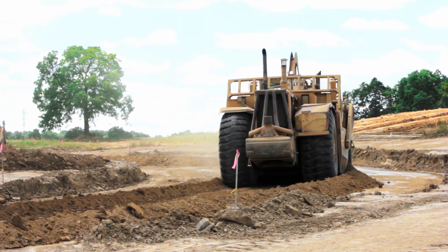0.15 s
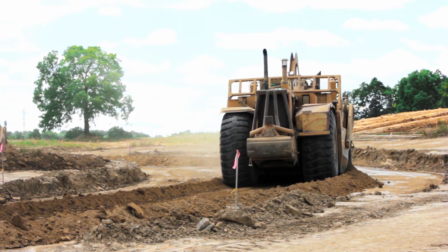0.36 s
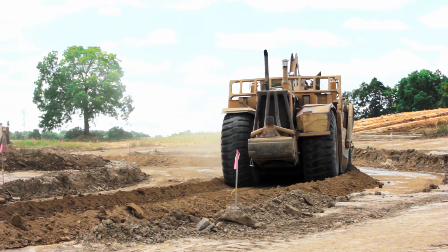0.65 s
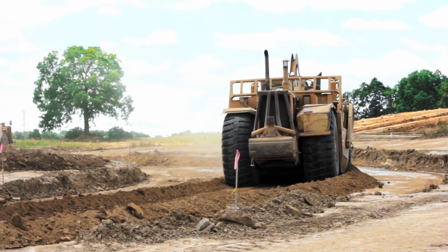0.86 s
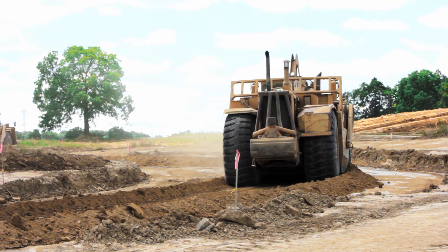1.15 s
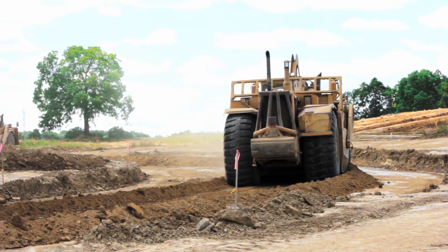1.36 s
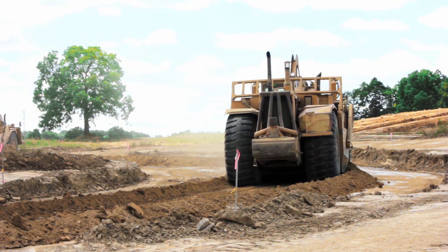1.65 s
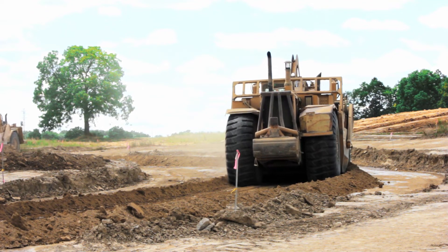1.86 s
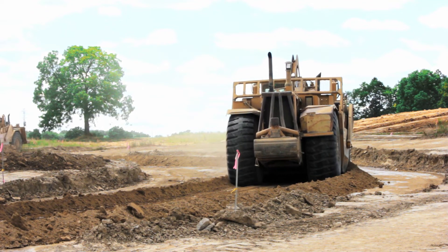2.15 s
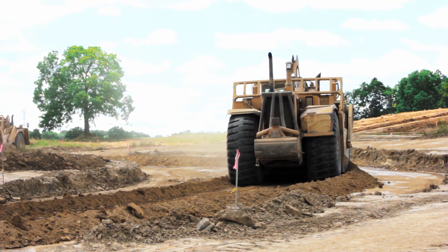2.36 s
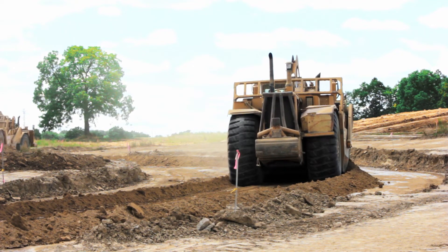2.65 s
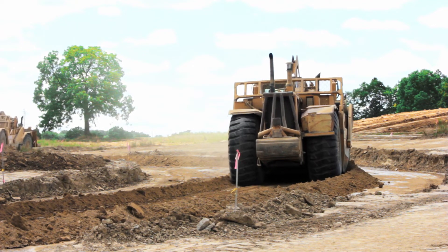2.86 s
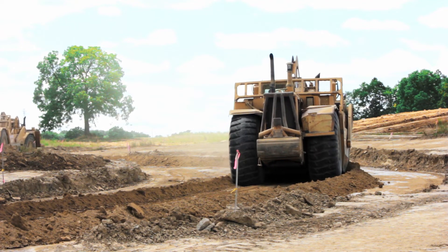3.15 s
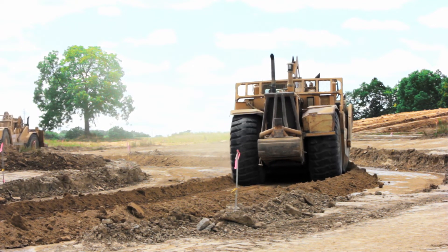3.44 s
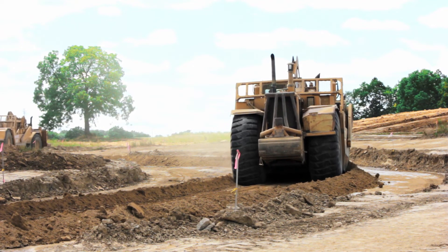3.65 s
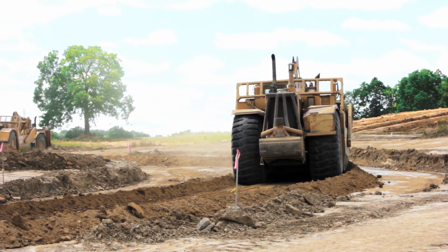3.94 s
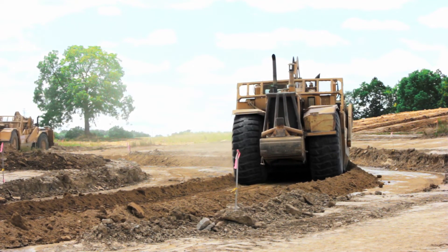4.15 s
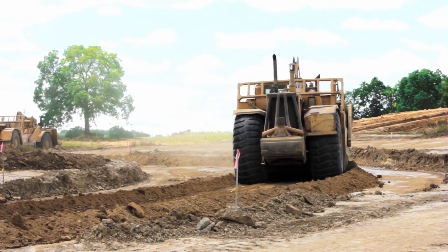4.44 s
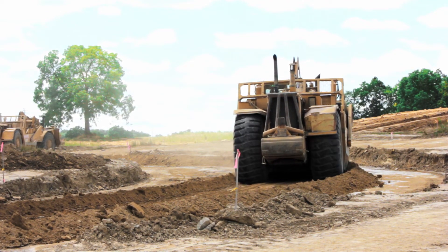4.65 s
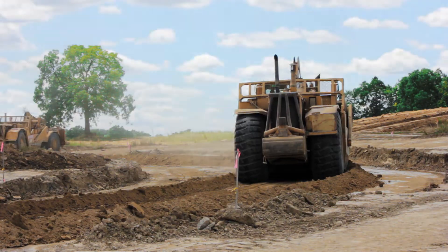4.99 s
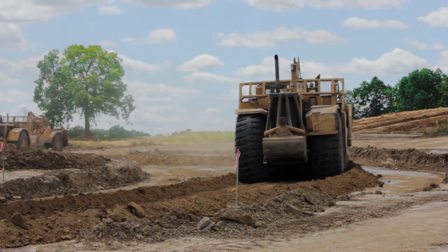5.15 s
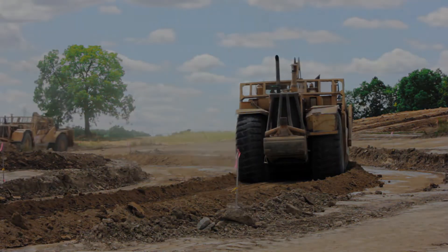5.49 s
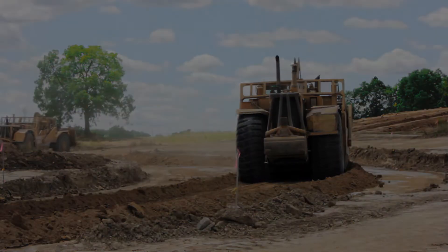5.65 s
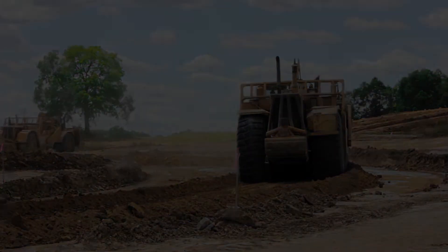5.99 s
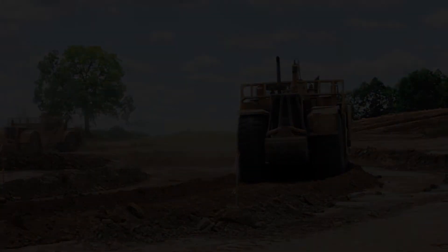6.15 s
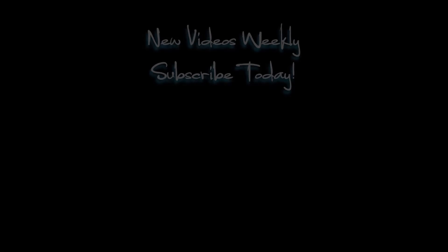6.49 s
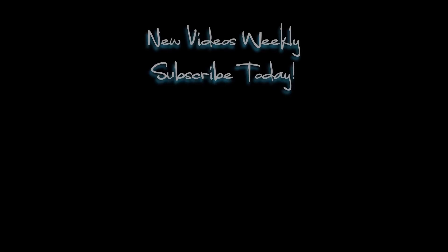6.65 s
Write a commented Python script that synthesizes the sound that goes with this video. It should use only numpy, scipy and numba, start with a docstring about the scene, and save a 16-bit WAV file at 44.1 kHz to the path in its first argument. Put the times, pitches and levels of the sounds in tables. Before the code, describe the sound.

Outdoors on open ground, a large earthmoving machine crawls closer with its diesel at nearly constant speed. A low exhaust drone, dense mechanical clatter and breathy hiss run together over soft tyre rumble, with a second engine faintly behind. A slightly harder pull swells the tone early on, then everything fades evenly to silence. The microphone stands in front at a moderate distance.

```python
"""Open ground: a big earthmoving scraper crawls closer over soft dirt, its diesel at a nearly steady speed.
Exhaust tones tied to the crank drone and bark twice a cycle; chopped noise makes the clatter of the block.
Noise through moving resonances is rushing air that puffs with the crank and swells in surges.
Wavering tones make a second diesel further off, a gliding tone is the drive hum, and low noise is
the tyres on soil. The whole scene fades out."""
import sys
import numpy as np
from scipy import signal
from scipy.fft import rfft, irfft, next_fast_len
from scipy.io import wavfile
from scipy.ndimage import uniform_filter1d, map_coordinates
from numba import njit

SR = 44100
rng = np.random.default_rng(int(sys.argv[2]) if len(sys.argv) > 2 else 0)


def wav_record(signal):
    """Record a signal, one row per channel, as 16-bit PCM in the file named by sys.argv[1]."""
    frames = np.transpose(np.atleast_2d(signal))
    bounded = np.clip(frames, -1, 1)
    # unit amplitude maps onto the largest positive 16-bit level
    quanta = np.round(bounded * 32767).astype(np.int16)
    wavfile.write(sys.argv[1], SR, quanta)


N = 300843
TIME = np.arange(N) / SR  # seconds
# A "cycle" below is one engine cycle: two turns of the crank.
SURGE_RISE_S, SURGE_FALL_S = 0.033, 0.041


def undb(db):
    """Turn decibels into a gain."""
    return 10 ** (np.asarray(db) / 20)


def unit(x):
    """Scale a signal to an rms of 1."""
    return x / np.sqrt(np.mean(x ** 2))


def curve(table, axis=1):
    """Join one column of a table by straight lines in time."""
    rows = np.array(table)
    return np.interp(TIME, rows[:, 0], rows[:, axis])


def colour(x, spectrum):
    """Filter white noise of rms 1 to a spectrum of (frequency [Hz], level [dB per Hz]) points."""
    hz, db = np.transpose(spectrum)
    size = next_fast_len(N)
    bin_hz = np.fft.rfftfreq(size, 1 / SR)
    gain = undb(np.interp(np.log(bin_hz + 1), np.log(hz), db))
    return irfft(rfft(x, size) * gain, size)[:N] * np.sqrt(SR / 2)


def walk(rate):
    """Wander slowly with rms 1: random levels, about `rate` per second, smoothed into ramps."""
    hold = int(SR / rate)
    steps = np.repeat(rng.standard_normal(N // hold + 1), hold)
    return unit(uniform_filter1d(steps, hold)[:N])


@njit
def resonance(x, hz, width):
    """Let noise ring around a moving centre, using a state-variable band-pass filter."""
    y, band, low = np.empty(len(x)), 0., 0.
    for i in range(len(x)):
        g, k = np.tan(np.pi * hz[i] / SR), width / hz[i]
        v = (band + g * (x[i] - low)) / (1 + g * (g + k))
        band = 2 * v - band
        low = low + 2 * g * v
        y[i] = k * v
    return y


def span(start, end, rise, fall):
    """Rise from 0 to 1, hold and fall; half way up at start and half way down at end."""
    return np.clip(np.minimum((TIME - start) / rise, (end - TIME) / fall) + .5, 0, 1)


def throb(cycle, depth, order):
    """Make a gain that swings `order` times in each engine cycle."""
    return 1 + depth * np.cos(2 * np.pi * order * cycle)


def accents(cycle, table):
    """Lift the level, in dB around a mean of 0, at crank angles that repeat every cycle."""
    lift_db = 0
    for place, width, db in table:
        distance = (cycle - place + .5) % 1 - .5
        lift_db = lift_db + db * np.exp(-(distance / width) ** 2)
    return lift_db - lift_db.mean()


def locked(cycle, count):
    """Repeat one random pattern of `count` points on every engine cycle, at rms 1."""
    pattern = rng.standard_normal(count)
    place = cycle % 1 * count
    return unit(map_coordinates(pattern - pattern.mean(), [place], order=3, mode="grid-wrap"))


def crank():
    """Count engine cycles from the crank speed; one cycle takes two turns."""
    # Crank speed: (time [s], speed [turns per minute])
    speed = [(0, 2019.1), (1, 2018.3), (2, 2021.2), (2.8, 2023.2), (3.6, 2020.8), (4.6, 2017.4),
             (5.1, 2018.7), (5.9, 2017.0)]
    return np.cumsum(curve(speed)) / 120 / SR - .23


def hard_pull():
    """Tell how hard the machine is digging in, 0-1, during its one hard pull."""
    start_s, end_s, ramp_s = 1.73, 3.0, 0.17
    return span(start_s, end_s, ramp_s, ramp_s)


def exhaust(cycle, flutter=.055, waver_db=.4):
    """Add tones locked to the crank, lined up at the barks of each cycle and an echo of the main one."""
    # Exhaust tones before swell and overall level: (waves per cycle, level [dB rms])
    tones = [(4, -47.5), (6, -31.0), (9, -48.5), (10, -46.0), (12, -22.0), (13, -41.0), (14, -36.0),
             (15, -42.5), (16, -40.0), (17, -41.0), (18, -41.5), (19, -40.0), (20, -42.0), (22, -46.5),
             (23, -43.5), (24, -41.0), (25, -43.0), (26, -41.0), (27, -41.5), (28, -48.0), (29, -40.0),
             (30, -40.0), (31, -47.0), (32, -40.0), (33, -37.3), (35, -38.5), (36, -46.5), (38, -49.0),
             (47, -45.0), (48, -45.5), (49, -46.5), (51, -48.0), (54, -44.5), (57, -47.0)]
    # Exhaust barks and the pipe echo after the main one: (place in the cycle [0-1], relative strength)
    bark_places = [(.001, 1), (.032, .5), (.376, .62), (.402, .42), (.49, .55)]
    # Swell and sag of the firing note: (time [s], level [dB])
    drone_swell = [(0, -.8), (.55, -.4), (.68, -1.8), (1, -.2), (1.17, -2.8), (1.35, -.3), (1.6, -1.2),
                   (1.8, 1.3), (2, 2.3), (2.17, -.5), (2.5, 1.3), (2.63, -.5), (2.75, 2.7), (2.86, -2.6),
                   (2.96, 1.5), (3.45, -.5), (3.65, .5), (4.15, -.5), (4.35, 1.2), (4.95, -1.2), (5.2, -.3),
                   (5.62, -.8), (5.8, -3.3), (6, -.3)]
    cylinders = 12  # also the order of the firing note
    pull_db, pull_octaves = 1.5, .6
    bright_order, bright_octaves, bright_db_per_s = 34, .2, .55
    out, shared_flutter = 0, walk(34)
    for order, db in tones:
        barks = sum(size * np.exp(-2j * np.pi * order * place) for place, size in bark_places)
        # each bark is a dip and then a spike, its treble smeared by the pipe
        smear = (.1 + .3 * (order / 36) ** 4) * rng.standard_normal()
        lead = np.angle(barks) - 1.1 + smear
        # uneven burning and moving air shake the high tones most
        height = order / 20
        shake = (1 + flutter * np.sqrt(height) * shared_flutter) * undb(waver_db * height * walk(5))
        if order == cylinders:
            # the firing note heaves and trembles
            swell_db = curve(drone_swell) + .4 * walk(25)
        else:
            # pulling hard swells the tones around the firing note
            nearness = np.exp(-(np.log2(order / cylinders) / pull_octaves) ** 2)
            swell_db = pull_db * nearness * hard_pull()
        # some upper tones come forward as the machine nears
        brightness = np.exp(-(np.log2(order / bright_order) / bright_octaves) ** 2)
        swell_db = swell_db + bright_db_per_s * (TIME - TIME.mean()) * brightness
        tone = np.cos(2 * np.pi * order * cycle + lead)
        out = out + np.sqrt(2) * undb(db + swell_db) * shake * tone
    # the exhaust as a whole sinks slowly and wavers in the moving air
    return out * undb(.56 - .18 * TIME + .04 * walk(7))


def clatter(cycle, firing_depth=0.069, fan_depth=0.025, stumble_db=.5, bounce_share=0.11, bounce_drift=0.099):
    """Rattle injectors and valves at set crank angles; firings and fan chop it, the ground mirrors it."""
    # The loudest knocks of the block: (place in the cycle [0-1], width [cycles], lift [dB])
    knock_places = [(.02, .05, 1.1), (.178, .013, 2.6), (.225, .02, 1.2), (.44, .04, 1), (.6, .018, 1.3),
                    (.76, .012, 1.3), (.885, .035, 1.6)]
    # Combustion knock and gear clatter, before load: (frequency [Hz], level [dB per Hz])
    rattle_spectrum = [(150, -94), (345, -59), (400, -58), (465, -59), (585, -55), (665, -59.5), (800, -57),
                       (880, -57), (1030, -56.5), (1550, -61), (1900, -61), (2400, -61.5), (3100, -63.5),
                       (4000, -66), (5500, -73), (7200, -77.5), (10500, -93.5), (15000, -106)]
    # Clatter that is alike on every cycle, before load: (frequency [Hz], level [dB per Hz])
    tapping_spectrum = [(200, -100), (450, -72), (650, -72), (1000, -66), (1400, -71), (2000, -70),
                        (3500, -79.5), (8000, -110)]
    # Engine load, used for its ups and downs around the mean: (time [s], level [dB])
    load = [(0.2, -25), (0.8, -26), (1.3, -25), (2.8, -25.5), (3.4, -26.5), (6, -27.5)]
    ground_lag_s = 0.00061
    knocks = undb(accents(cycle, knock_places) + stumble_db * walk(45))
    gate = unit(knocks * throb(cycle, firing_depth, order=6) * throb(cycle, fan_depth, order=14))
    rattle = colour(gate * rng.standard_normal(N), rattle_spectrum)
    tapping = colour(gate * locked(cycle, count=int(N / cycle[-1])), tapping_spectrum)
    load_db = curve(load)
    direct = (rattle + tapping) * undb(load_db - load_db.mean())
    # moving air shifts the lag of the bounce, so the colour drifts
    lag_s = ground_lag_s * (1 + bounce_drift * walk(3))
    bounce = np.interp(TIME - lag_s, TIME, direct)
    return direct + bounce_share * bounce


def gear_whine(cycle, db=-45, waver_db=3, order=110):
    """Sing one thin, wavering tone from the timing gears, locked to the crank."""
    level = np.sqrt(2) * undb(db + waver_db * walk(9))
    return level * np.sin(2 * np.pi * order * cycle + 1.3 * walk(15))


def surges(axis):
    """Lift the level, in dB, in short surges of air: axis 0 for the hiss, 1 for the sizzle."""
    # Surges of rushing air: (start [s], length [s], hiss lift [dB], sizzle lift [dB]);
    # each lift is scaled later by the share that its sound takes
    surge_list = [(.06, .09, 1, 3), (.36, .15, 4.2, 5.5), (.53, .17, 2, 2.4), (.88, .14, 2.6, 1.4),
                  (1.25, .09, 4.6, 4), (1.46, .06, 1.2, 2.5), (2.47, .33, 3, 4), (4.16, .35, 6, 5),
                  (4.52, .08, 2.5, 1), (4.64, .12, 4.8, 4.4), (4.9, .105, 5.6, 4), (5.19, .08, .8, 3),
                  (5.42, .08, .8, 4.5), (5.61, .08, 1, 4.5)]
    lift_db = 0
    for start, length, *db in surge_list:
        lift_db = lift_db + db[axis] * span(start, start + length, SURGE_RISE_S, SURGE_FALL_S)
    return lift_db


def sizzle(cycle, nearing_db_per_s=0.2, surge_share=1.1):
    """Shape the faint top of the hiss: it flares with surges and spits unevenly at one crank angle."""
    # Faint top of the hiss, before its rises and flares: (frequency [Hz], level [dB per Hz])
    top_spectrum = [(5000, -101), (9500, -86.5), (10600, -96), (11400, -93.5), (13500, -100), (14500, -98),
                    (15500, -102)]
    spit_place, spit_width = .385, .035  # in cycles
    spit_force_db = 2 + 1.8 * walk(17)
    spit_db = accents(cycle, [(spit_place, spit_width, 1)]) * spit_force_db
    flicker_db = .8 * walk(45)
    db = nearing_db_per_s * TIME + surge_share * surges(axis=1) + spit_db + flicker_db
    return colour(rng.standard_normal(N), top_spectrum) * undb(db)


def air(cycle, firing_depth=.09, band_waver_db=.8):
    """Puff hiss at set crank angles; its resonances shift and trade strength as the machine nears."""
    # Puffs of hiss, before scatter and share: (place in the cycle [0-1], width [cycles], lift [dB])
    puff_places = [(.02, .05, 1.1), (.19, .025, 1.4), (.4, .045, 3.6), (.57, .075, 3), (.73, .015, 1.4),
                   (.885, .03, 2.8)]
    # Flow of rushing air, used relative to the mean level: (time [s], level [dB])
    flow = [(0, -36.5), (1.75, -38.5), (1.92, -35), (2.4, -36.5), (3.1, -37.5), (3.45, -42), (4.1, -42.5),
            (4.8, -44), (6, -39)]
    # Resonances: (early centre [Hz], late centre [Hz], width of each of two filter passes [Hz],
    # early, middle and late level over the mean level [dB], share of flow and surge [dB per dB])
    bands = [(2950, 3150, 750, -3, -1.8, -1.2, .3), (4620, 5030, 1050, 1, 1.2, 3, .6),
             (5760, 5500, 500, -5, -14, -5.5, .8), (6370, 6560, 800, -3.8, -3.8, -3, 1.1),
             (7820, 7650, 1300, -9, -7, .2, 1.3), (8190, 8600, 1100, -2.7, -3.8, -3.6, 1.05)]
    mean_db = -34
    # the lower resonances puff deepest, and ring louder for a moment
    low_puff_share, low_puff_below_hz = 1.5, 7000
    ring_start_s, ring_end_s, ring_db, ring_below_hz = 1.22, 1.68, 3, 5000
    ring = ring_db * span(ring_start_s, ring_end_s, SURGE_RISE_S, SURGE_FALL_S)
    # puffs differ in force from cycle to cycle
    puff_db = accents(cycle, puff_places) * (1 + .25 * walk(34))
    late = curve([(1.2, 0), (3.2, .5), (4.3, 1)])  # 0 early, 1 late
    stage = curve([(1.5, 0), (2.1, 1), (3.3, 1), (4.3, 2)])  # 0 early, 1 middle, 2 late
    # turbulence makes the flow flicker
    surge_db = curve(flow) + surges(axis=0) - mean_db + .8 * walk(40)
    out = sizzle(cycle) * unit(undb(puff_db))
    for early_hz, late_hz, width, *stage_db, share in bands:
        hz = (early_hz + (late_hz - early_hz) * late) * (1 + .014 * walk(10))
        db = np.interp(stage, np.arange(3), stage_db) + band_waver_db * walk(18)
        if early_hz < ring_below_hz:
            db = db + ring
        puff_share = low_puff_share if early_hz < low_puff_below_hz else 1
        puffs = undb(puff_db * puff_share)
        once = resonance(rng.standard_normal(N), hz, 1. * width)
        band = resonance(once, hz, 1. * width)
        out = out + unit(band * puffs) * undb(mean_db + db + share * surge_db)
    return out * throb(cycle, firing_depth, order=6)


def far_diesel():
    """Rumble low engine tones that grow as a second machine nears, and waver on their way over the ground."""
    # Tones before the slow growth: (frequency [Hz], width of the pitch waver [Hz], level [dB rms])
    far_tones = [(62.2, 5, -49.5), (112.3, 6, -40.5), (122.8, 5.5, -43), (146.5, 4, -38),
                 (170.2, 5.3, -38.5), (185.8, 10, -45), (207, 12, -43)]
    nearing_db_per_s = 0.6
    out = 0
    for hz, width, db in far_tones:
        phase = np.cumsum(hz + width / 2 * walk(12)) / SR + rng.random()
        tone = undb(2.2 * walk(7.8)) * np.sin(2 * np.pi * phase)
        out = out + undb(db) * unit(tone)
    return out * undb(nearing_db_per_s * (TIME - TIME.mean()))


def drive_hum(lift_db=.8):
    """Glide a single tone that sags and recovers with the drive, and nearly dies in the hard pull."""
    # The hum, before its lift and waver: (time [s], pitch [Hz], level [dB rms])
    glide = [(.15, 297, -31.5), (.35, 286, -34), (.6, 294, -31), (.75, 289, -33), (.92, 277, -29),
             (1.18, 275, -31), (1.32, 257, -33.5), (1.65, 252, -34), (1.8, 248, -43), (2.85, 246, -44),
             (3.1, 253, -35.5), (3.5, 268, -33), (3.95, 275, -32), (4.08, 270, -37), (4.35, 267, -35),
             (4.75, 255, -32), (5.05, 251, -32), (5.28, 256, -30), (5.42, 262, -36), (5.85, 281, -31.5),
             (6.15, 294, -34)]
    phase = np.cumsum(curve(glide) + .8 * walk(14)) / SR
    waver_db = .8 * walk(16)
    level = np.sqrt(2) * undb(lift_db + curve(glide, axis=2) + waver_db)
    return level * np.sin(2 * np.pi * phase)


def ground():
    """Rumble tyres and churned soil evenly under the machine, as steady low noise."""
    # Tyres and churned soil: (frequency [Hz], level [dB per Hz])
    soil_spectrum = [(20, -89), (40, -68.5), (80, -60.5), (110, -54.5), (200, -51), (280, -54.5),
                     (330, -57.5), (480, -71), (900, -80.5), (4000, -125)]
    return colour(rng.standard_normal(N), soil_spectrum)


def scene():
    """Drive exhaust, clatter, gears and air from one crank, then add the other sounds."""
    cycle = crank()
    engine = exhaust(cycle) + clatter(cycle) + gear_whine(cycle) + air(cycle)
    return (engine + far_diesel() + drive_hum() + ground())[None]


def record(dry):
    """Fade in a straight line to silence, and cut off the top treble."""
    fade_start_s, fade_end_s, top_hz = 4.75, 6.367, 15000
    fade = np.clip((fade_end_s - TIME) / (fade_end_s - fade_start_s), 0, 1)
    low_pass = signal.ellip(8, .2, 70, top_hz, fs=SR, output="sos")
    return signal.sosfilt(low_pass, dry * fade)


dry = scene()
out = record(dry)
wav_record(out)
```